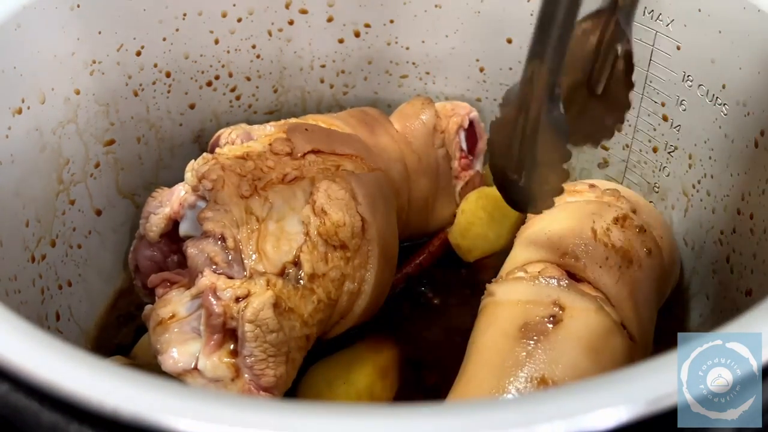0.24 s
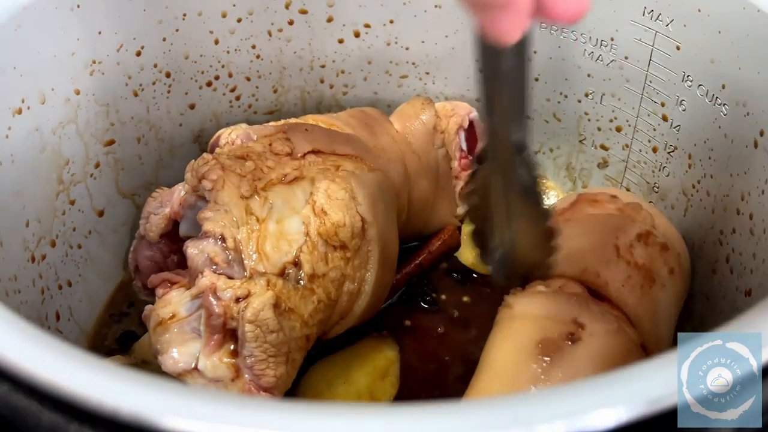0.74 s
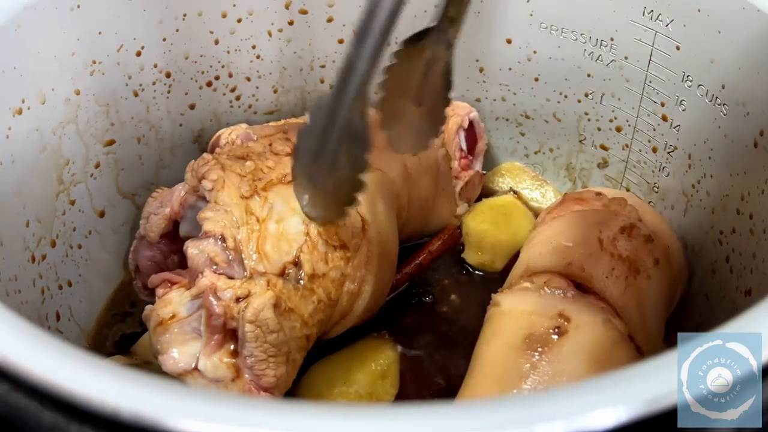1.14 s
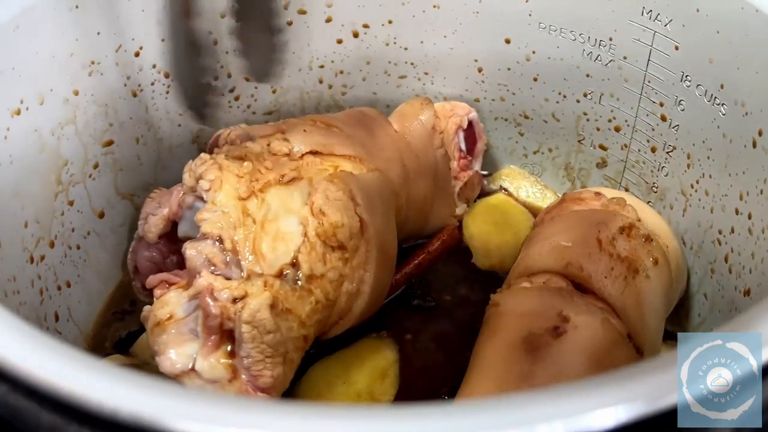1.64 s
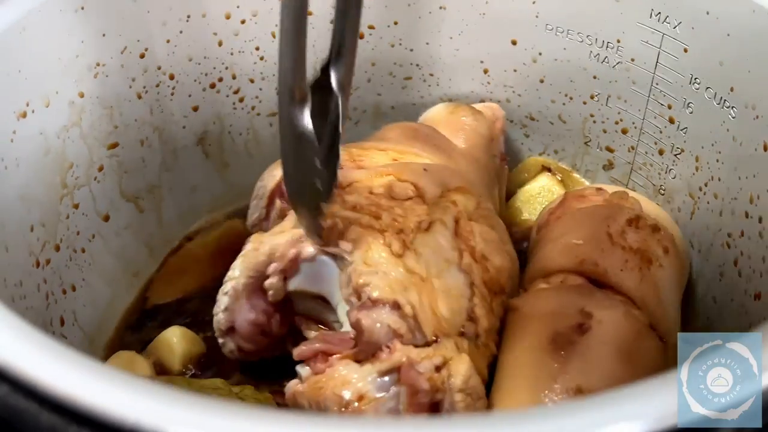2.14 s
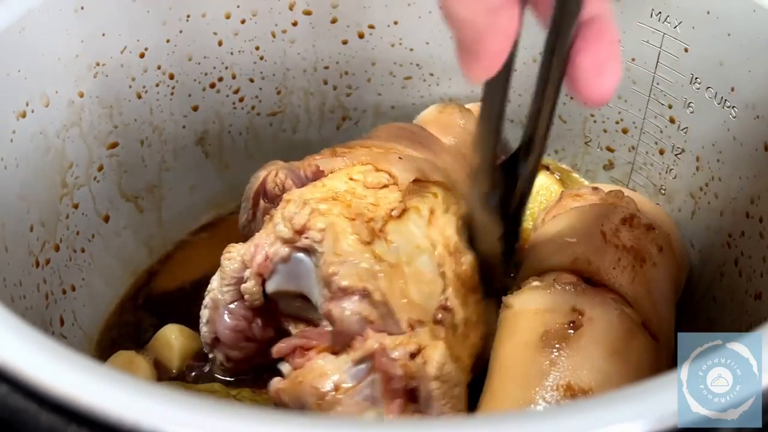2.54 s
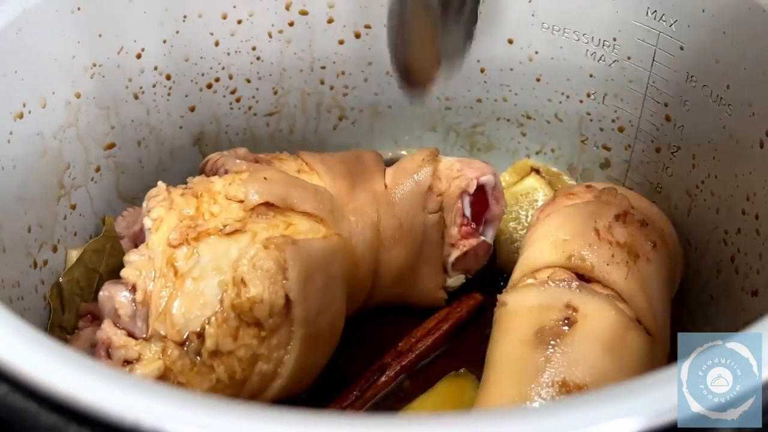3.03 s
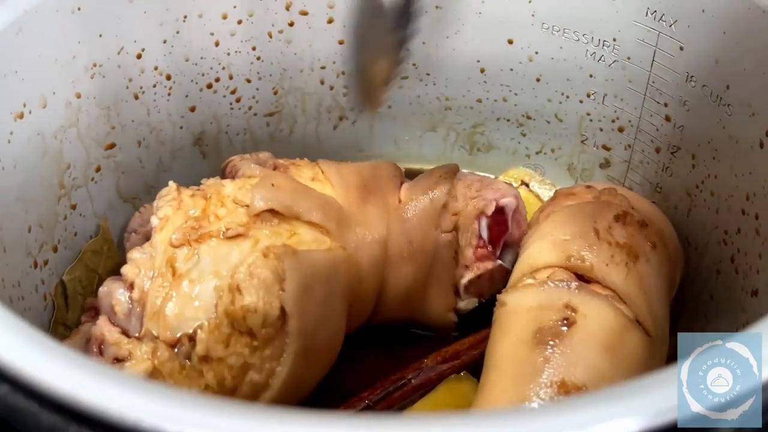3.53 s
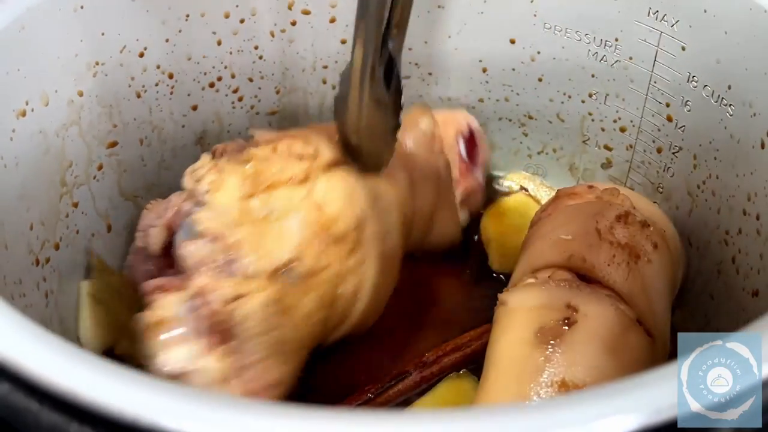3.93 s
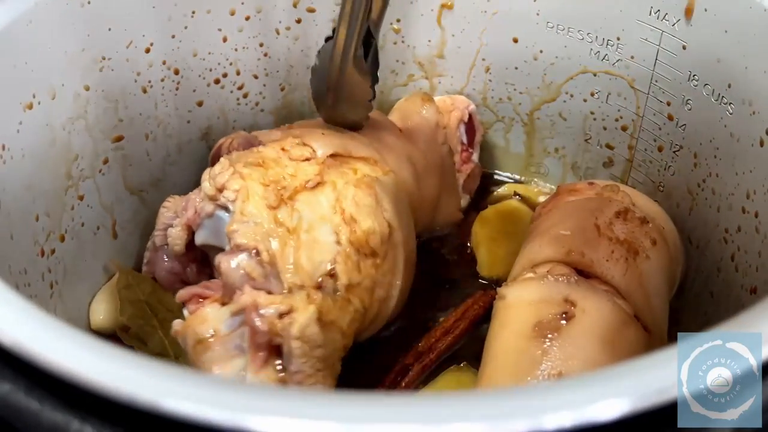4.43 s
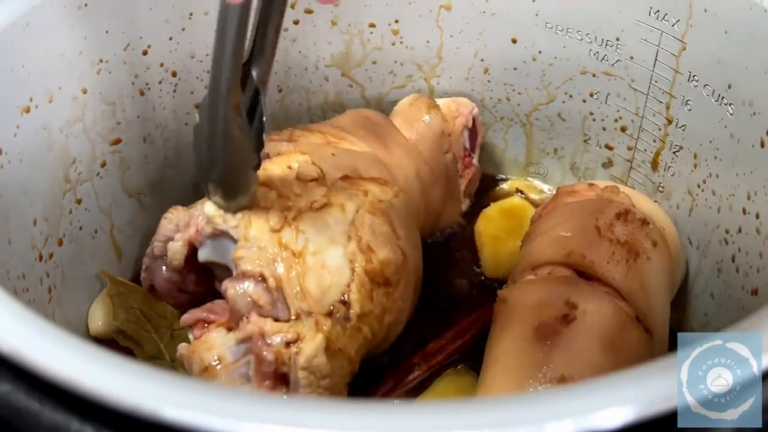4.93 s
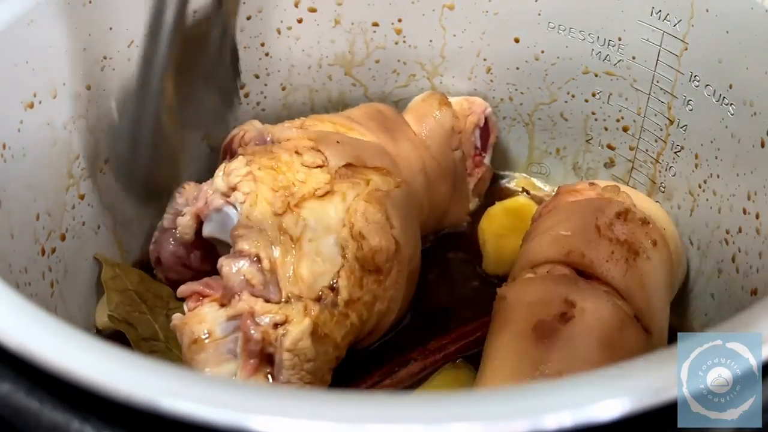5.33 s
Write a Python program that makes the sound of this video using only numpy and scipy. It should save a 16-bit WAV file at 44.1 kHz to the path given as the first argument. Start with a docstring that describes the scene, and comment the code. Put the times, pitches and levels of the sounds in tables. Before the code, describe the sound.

Close-up of metal tongs snapping and ticking, meat sliding wetly and landing in simmering sauce, tiny bubbles popping, steady low hum beneath.

```python
"""Tongs in a simmering pot

Steel tongs turn pork knuckles in simmering sauce in a cooker pot, close to the microphone.
The tongs snap shut as noise bursts and ring as decaying modes. The meat smacks as short bursts with
ringing air pockets, slides as a crackle of grains, squeaks once and thumps the modes of the pot floor.
Small bubbles pop all the while as rising sine chirps, over filtered fan noise and humming lines."""
import sys
import numpy as np
from scipy import signal
from scipy.fft import rfft, irfft, next_fast_len
from scipy.io import wavfile
from scipy.ndimage import uniform_filter1d

SR = 44100
rng = np.random.default_rng(int(sys.argv[2]) if len(sys.argv) > 2 else 0)


def persist_wave(psi):
    """Save psi, clipped to +-1, as 16-bit WAV."""
    counts = np.round(np.clip(psi, -1, 1) * 32767).astype(np.int16)
    wavfile.write(sys.argv[1], SR, np.atleast_2d(counts).T)


N = 245637
T = np.arange(N) / SR
HIT = T[:int(SR * .9)]  # time axis of a single hit, s


def undb(db):
    """Decibels to gain."""
    return 10 ** (np.asarray(db) / 20)


def unit(x):
    """Scale to rms 1."""
    return x / np.sqrt(np.mean(x ** 2))


def unit_energy(x):
    """Scale so that the squares sum to 1."""
    return x / np.sqrt(np.sum(x ** 2))


def fade(t60):
    """Exponential decay over the length of a hit, down 60 dB after t60 seconds."""
    return np.exp(-np.log(1000) * HIT / max(t60, 1e-3))


def add(out, s, x):
    """Mix x into out from time s."""
    i = max(int(s * SR), 0)
    out[i:i + len(x)] += x[:max(N - i, 0)]


def colour(x, hz, db):
    """Causal filter through (Hz, dB) points, with unit power gain."""
    size = next_fast_len(len(x) + 4096, True)
    size += size % 2
    log_hz = np.log(np.fft.rfftfreq(size, 1 / SR) + 1)
    gain = unit(undb(np.interp(log_hz, np.log(hz), db)))
    # folding the cepstrum gives minimum phase, so nothing sounds before the attack
    cepstrum = irfft(np.log(gain))
    cepstrum[1:size // 2] *= 2
    cepstrum[size // 2 + 1:] = 0
    return irfft(rfft(x, size) * np.exp(rfft(cepstrum)), size)[:len(x)]


def ring(hz, db, t60):
    """A set of freely decaying modes."""
    return sum(undb(d) * np.sin(2 * np.pi * f * HIT) * fade(t) for f, d, t in zip(hz, db, t60))


def tone(hz, t60):
    """One decaying resonance of unit energy, with a softened attack."""
    return unit_energy(ring([hz], [0], [t60]) * (1 - np.exp(-HIT / 0.00068)))


def rattle(t60, rise_s, evenness=0.3):
    """A noise burst for a flurry of tiny contacts: it builds up and decays, its spectrum partly evened."""
    swell = np.clip(HIT / rise_s, 0, 1)
    spectrum = rfft(rng.standard_normal(len(HIT)) * swell * fade(t60))
    evened = spectrum / (np.abs(spectrum) + 1e-12) ** evenness
    return unit_energy(irfft(evened, len(HIT)) * swell * fade(t60 * 3))


def walk(rate):
    """Slow random drift of rms 1, from twice-smoothed random steps at rate per second."""
    k = int(SR / rate)
    steps = np.repeat(rng.standard_normal(N // k + 1), k)
    return unit(uniform_filter1d(uniform_filter1d(steps, k), k)[:N])


# Steel on steel. Each row: start in seconds, relative level in dB, treble lift in dB, ring in dB,
# place of contact from 0 (tips) to 1 (arms), pitch of the contact in Hz.
CLINKS = [(0.0962, -24.5, 4, -1.5, 0.2, 6200), (0.351, -36.5, -2, 0, 0.5, 3140),
          (0.6537, -3.5, 2.5, 6.5, 0.31, 6500), (0.882, -23.5, 6.5, 0, 0.3, 3010),
          (1.209, -38, 7, 2, 0.33, 4960), (1.3792, -39.5, 6, 8, 0.38, 3730),
          (2.1194, -34.5, 9, 5, 0.38, 3600), (2.1605, -10.5, 4, -3, 0.66, 3510),
          (2.486, -27, 2, -1, 0.58, 3860), (3.2093, -4.7, 1, -2, 0.75, 4150),
          (3.3801, -24, -1.5, 3, 0.67, 3670), (3.403, -20, 1, -9, 0.28, 4170),
          (4.3487, -18.5, 1.5, -4.5, 0.69, 4020), (4.646, -30.5, 15, -0.5, 0.31, 6600),
          (5.2919, -29, 7, -7, 0.41, 3420)]
# Modes of the tongs. Each row: pitch in Hz, level in dB struck at the tips, level in dB struck on the arms,
# t60 in seconds.
TONG_MODES = [(2616, -8, -26, .3), (3408, -7, -14, .45), (3596, -1, -15, .42), (3770, -15, -1, .36),
              (3985, -3, -15, .5), (4040, 0, -11, .55), (4183, -6, -5, .38), (5227, -3, -4, .6),
              (5351, -20, -3, .48), (5507, -16, -2, .35), (5577, -4, -18, .6), (5712, -7, -18, .6),
              (6137, -6, -18, .6), (6476, -20, 2, .48), (6556, -16, 0, .42), (6674, -14, 0, .4),
              (6812, -5, 1, .33), (6848, -2, -14, .6), (6903, -1, -14, .5), (7510, -14, -4, .2),
              (9787, -11, -13, .3), (13460, -20, -5, .24)]
# Colour of a clink. Each row: frequency in Hz, level in dB at the tips, level in dB on the arms.
TONG_COLOUR = [(890, -35, -23.5), (1986, -20.5, -27.5), (2880, -1, -25), (3360, 0, -3), (4050, -1, 4),
               (4830, -6, -13), (5230, 2, 2), (5790, -10, -15), (6240, 0, -4.5), (7720, -11, -8.5),
               (8800, -15, -12), (9650, -10, -14), (10860, -12.5, -26), (13700, -15, -10),
               (15640, -11.5, -15), (17000, -27, -10)]


def tongs(clack_t60=0.034, rise_s=0.00053, clack_db=10, pitch_t60=.022, choke_t60=0.02, choke_db=-15,
          graze_s=.002, graze_db=-13, shimmer_db=-29, mode_db=-37):
    """The arms graze, clack together, then ring with a few strong modes over a shimmer of weak ones."""
    out = np.zeros(N)
    hz, tips_db, arms_db = np.transpose(TONG_COLOUR)
    mode_hz, mode_tips, mode_arms, t60 = np.transpose(TONG_MODES)
    for s, db, treble_db, ring_db, place, pitch_hz in CLINKS + jiggles():
        # the treble lift grows from 5 kHz to its full amount at 10 kHz
        lift = treble_db * np.clip(np.log2(hz / 5000), 0, 1)
        shape = tips_db + place * (arms_db - tips_db) + lift
        levels = mode_tips + place * (mode_arms - mode_tips) + rng.standard_normal(len(t60))
        modes = ring(mode_hz, levels, t60)
        contacts = colour(rattle(clack_t60, rise_s), hz, shape)
        clack = undb(clack_db) * contacts + tone(pitch_hz, pitch_t60)
        # pressed together, the arms choke most of their ring at once
        choked = undb(choke_db) * modes * fade(choke_t60) * np.clip(HIT / rise_s, 0, 1)
        tail = undb(shimmer_db) * shimmer(hz, shape) + undb(mode_db) * modes
        add(out, s, undb(db) * (clack + choked + undb(ring_db) * tail))
        # the toothed tips touch just before they close
        graze = (1 - place) * colour(rattle(clack_t60, rise_s), hz, shape)
        add(out, s - graze_s, undb(db + clack_db + graze_db) * graze)
    return out


def jiggles(count=6, db=-43, spread_db=4, treble_db=3, ring_db=2, pitch_hz=3900):
    """Faint chance ticks of the tongs shifting in the hand, as rows like those of CLINKS."""
    rows = []
    for k, (when, size, place) in enumerate(rng.random((count, 3))):
        start = (k + when) / count * N / SR
        rows.append((start, db + spread_db * (size - .5), treble_db, ring_db, place, pitch_hz))
    return rows


def shimmer(hz, shape, spacing_hz=30, wash_db=-2, bloom_s=.012, t60=0.53, splash_t60=0.51):
    """A crowd of weak steel modes in a wash of noise; it blooms briefly, its treble dying slightly sooner."""
    f = np.fft.rfftfreq(len(HIT), 1 / SR)
    is_mode = rng.random(len(f)) < f[1] / spacing_hz
    envelope = undb(np.interp(np.log(f + 1), np.log(hz), shape))
    size = (unit(is_mode * 1.) + undb(wash_db)) * envelope
    spectrum = size * np.exp(2j * np.pi * rng.random(len(f)))
    low = irfft(spectrum * (f <= 8000), len(HIT))
    high = irfft(spectrum * (f > 8000), len(HIT))
    tail = low * fade(t60) + high * fade(splash_t60)
    return tail * np.clip(HIT / bloom_s, 0, 1) ** 2 / np.std(low + high)


# Wet smacks of meat and sauce. Each row: start in seconds, relative level in dB,
# treble tilt in dB per octave, pitch of the trapped air in Hz.
SMACKS = [(1.725, -33, -3, 3320), (1.9617, -35, -0.5, 1950), (2.0311, -31.5, -0.5, 4350),
          (2.0624, -32.5, -5.5, 1980), (2.7428, -22, 0, 1516), (3.9935, -20, -1, 1650),
          (4.0873, -32, 0, 3960), (5.04, -26, -5, 3540), (5.4627, -26, 2, 3630)]
# Colour of a smack, shared by the slides. Each row: frequency in Hz, level in dB.
SMACK_COLOUR = [(300, -12), (900, 3), (1600, -5), (2400, -2), (3500, 1), (5000, -6), (7000, -10.5),
                (10000, -17), (15500, -29)]


def smacks(t60=0.077, rise_s=0.00034, gain_db=11, pocket_t60=0.032, pocket_db=2):
    """Wet skin slaps or parts: a short burst, and a pocket of air that rings in it."""
    out = np.zeros(N)
    hz, shape = np.transpose(SMACK_COLOUR)
    for s, db, tilt_db, pocket_hz in SMACKS:
        burst = colour(rattle(t60, rise_s), hz, shape + tilt_db * np.log2(hz / 3000))
        pocket = tone(pocket_hz, pocket_t60)
        add(out, s, undb(db) * (undb(gain_db) * burst + undb(pocket_db) * pocket))
    return out


# Meat sliding through the sauce. Each row: start in seconds, end in seconds, level in dB.
SLIDES = [(1.69, 1.836, -63), (1.85, 2.12, -54), (2.666, 2.828, -51), (3.345, 3.437, -49.5),
          (3.94, 4.134, -56), (4.997, 5.15, -61)]


def slides(grains_per_s=1600, cycles=16):
    """Films of sauce tear and tiny air pockets ring in a dense crackle while the meat moves."""
    motion, grains, t = np.zeros(N), np.zeros(N), HIT[:1024]
    for start, end, db in SLIDES:
        add(motion, start, undb(db) * np.hanning(max(int((end - start) * SR), 2)))
    for when, pitch, size in rng.random((int(grains_per_s * N / SR), 3)):
        hz = 500 * 24 ** pitch  # 500 Hz to 12 kHz
        # every grain falls by 60 dB within the same number of cycles
        decay = np.exp(-np.log(1000) * hz * t / cycles)
        add(grains, when * N / SR, size * hz * np.sin(2 * np.pi * hz * t) * decay)
    return unit(colour(grains, *np.transpose(SMACK_COLOUR))) * motion


def squeak(start_s=3.92, length_s=0.046, slip_hz=660, jitter=0.04, db=-43):
    """Wet skin sticks and slips on the steel as the meat slides out of the tongs."""
    out, swell = np.zeros(N), np.hanning(int(length_s * SR))
    slip_rate = slip_hz * (1 + jitter * walk(700)[:len(swell)])
    phase = 2 * np.pi * np.cumsum(slip_rate) / SR
    # the steel picks out the overtones near 3 kHz
    buzz = sum(np.sin(k * phase + k * k) / np.hypot(1, (k * slip_hz - 3100) / 800) for k in range(2, 7))
    add(out, start_s, undb(db) * unit(buzz) * swell)
    return out


# The meat lands and rolls on the pot floor. Each row: start in seconds, relative level in dB,
# contact time in seconds.
THUMPS = [(2.036, -19, 0.0038), (2.054, -32.5, 0.0039), (2.078, -25, 0.0041), (3.995, -27, 0.0008),
          (4.047, -26, 0.0045)]
# Modes of the loaded pot. Each row: pitch in Hz, level in dB, t60 in seconds.
POT_MODES = [(88, -10, 0.27), (135.8, -5, 0.33), (181, -2.5, 0.17), (217.5, -1, 0.14), (274.7, -1.5, 0.21),
             (323.4, 4, 0.09), (422, -7, 0.13), (515, -9.5, 0.068), (611, -2.5, 0.26), (723, 0, 0.051),
             (960, -11, 0.045), (1600, -9, 0.21), (1954, 3, 0.089), (2760, -5, 0.08), (3370, 2, 0.2)]


def thumps(gain_db=-6):
    """Soft blows on the pot floor; a longer contact favours the low modes."""
    out = np.zeros(N)
    # neighbouring modes swing in opposite directions, so the boom builds over a few cycles
    pot = sum((-1) ** k * ring([hz], [db], [t60]) for k, (hz, db, t60) in enumerate(POT_MODES))
    for s, db, contact in THUMPS:
        push = HIT * np.exp(-2 * np.pi * HIT / contact)
        add(out, s, undb(db + gain_db) * signal.fftconvolve(pot, push / push.sum()))
    return out


# The bubbles' pitch shifts each time the meat is turned and settles in the sauce.
# Each row: time in seconds, pitch in Hz.
BUBBLE_PITCH = [(1.9, 990), (2.1, 845), (3.9, 832), (4.1, 970)]
# The loudest bubbles. Each row: start in seconds, relative level in dB.
BUBBLES = [(0.296, -39.5), (0.831, -33.5), (1.005, -39.5), (1.137, -37), (1.251, -38), (1.459, -36.5),
           (1.708, -39), (2.667, -34), (2.918, -40), (3.158, -40.5), (3.189, -37), (3.403, -34.5),
           (4.85, -35.5), (5.044, -35), (5.462, -37)]


def simmer(t60=0.017, gain_db=3, glide=6, film_ratio=1.65, film_t60=0.0066, film_db=-5,
           film_scatter=.1, pitch_scatter=0.043):
    """Each bubble bursts with a brief snap of its film and a few cycles of rising pitch."""
    out, t = np.zeros(N), HIT[:2048]
    large = [(s, db, np.exp(pitch_scatter * rng.standard_normal())) for s, db in BUBBLES]
    medium = stream(per_s=7, db=-43, spread_db=3.5, ratio=.98, scatter=.1)
    small = stream(per_s=30, db=-52, spread_db=4.5, ratio=1.25, scatter=.4)
    swell = 1 - np.exp(-t / 0.00069)
    cavity_fade, film_fade = fade(t60)[:len(t)], fade(film_t60)[:len(t)]
    films = film_ratio * np.exp(film_scatter * rng.standard_normal(1000))
    for (s, db, ratio), film in zip(large + medium + small, films):
        hz = ratio * np.interp(s, *np.transpose(BUBBLE_PITCH))
        phase = 2 * np.pi * hz * t * (1 + glide * t)
        cavity = cavity_fade * np.sin(phase)
        snap = undb(film_db) * film_fade * np.sin(film * phase)
        add(out, s, undb(db + gain_db) * swell * (cavity - snap))
    return out


def stream(per_s, db, spread_db, ratio, scatter):
    """Bubbles that rise at loosely even intervals, as rows (s, relative level dB, pitch ratio)."""
    rows = []
    for k, (when, size, pitch) in enumerate(rng.uniform(-1, 1, (400, 3))):
        if k < per_s * N / SR:
            start = (k + .5 + .5 * when) / per_s
            rows.append((start, db + spread_db * size, ratio * np.exp(scatter * pitch)))
    return rows


# Colour of the kitchen air. Each row: frequency in Hz, relative density in dB per Hz.
AIR = [(20, -15), (35, -10.5), (50, -4), (80, 2), (120, 1), (180, -1.5), (280, -5), (480, -15.5),
       (950, -16), (2000, -27.5), (4000, -26), (7000, -30), (12000, -38), (15500, -34.5)]
# Hum of motors and mains. Each row: pitch in Hz, mid rms level in dB.
HUM = [(49.2, -58), (95.5, -63), (99.6, -52), (164, -60), (194, -60)]


def kitchen(air_db=-50, flicker_db=1, hum_drift_db=2):
    """Fan noise that wavers slightly, and humming lines that drift in level and phase and beat together."""
    noise = colour(rng.standard_normal(N), *np.transpose(AIR))
    out = noise * undb(air_db + flicker_db * walk(11))
    for hz, db in HUM:
        level = undb(db + hum_drift_db * walk(3.995)) * np.sqrt(2)
        out += level * np.sin(2 * np.pi * (hz * T + rng.random()) + .5 * walk(4.05))
    return out


def space(x, wall_s=0.00211, wall_gain=0.12, room_t60=0.32, room_db=-11):
    """One quick echo off the pot wall, and the faint tail of the kitchen."""
    tail = rng.standard_normal(len(HIT)) * fade(room_t60) * np.clip(HIT / 0.0032, 0, 1)
    response = undb(room_db) * unit_energy(tail)
    response[0] += 1  # direct sound
    response[int(wall_s * SR)] += wall_gain
    return signal.fftconvolve(x, response)[:N]


def scene():
    """Tongs above the pot, wet sounds down inside it, the kitchen around."""
    in_pot = smacks() + slides() + squeak() + thumps() + simmer()
    return (tongs() + space(in_pot) + kitchen())[None]


def record(dry, low_hz=36, top_hz=15750):
    """The microphone drops the deepest bass and the recorder cuts the top."""
    thin = signal.sosfilt(signal.butter(3, low_hz, "high", fs=SR, output="sos"), dry)
    return signal.sosfilt(signal.ellip(10, .2, 80, top_hz, fs=SR, output="sos"), thin)


dry = scene()
out = record(dry)
persist_wave(out)
```